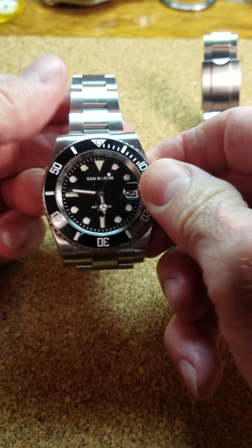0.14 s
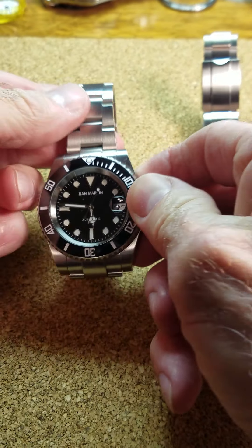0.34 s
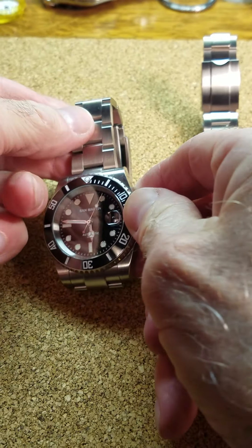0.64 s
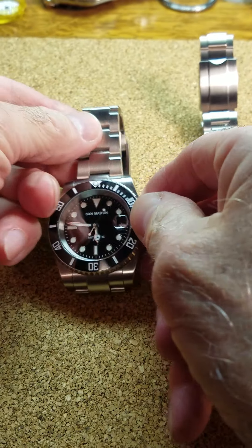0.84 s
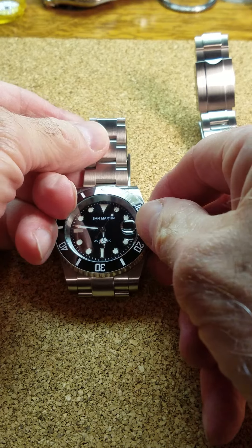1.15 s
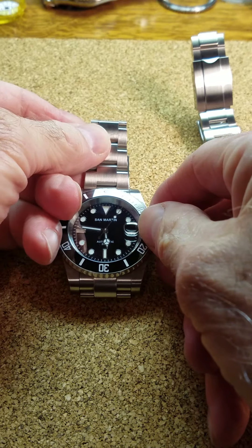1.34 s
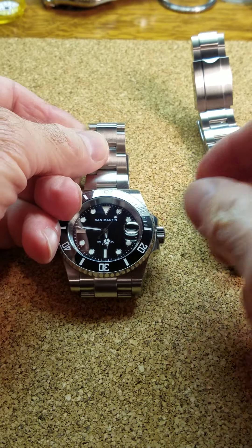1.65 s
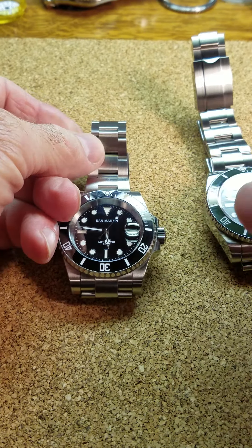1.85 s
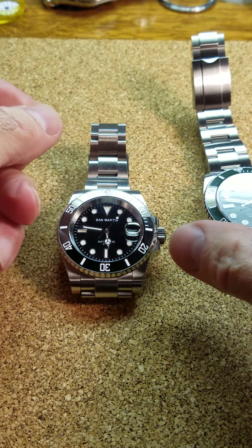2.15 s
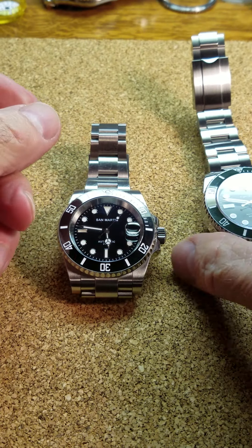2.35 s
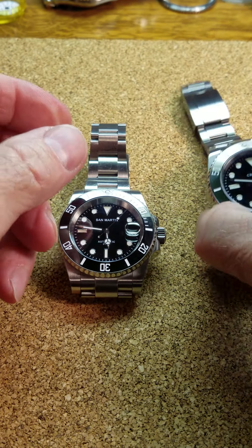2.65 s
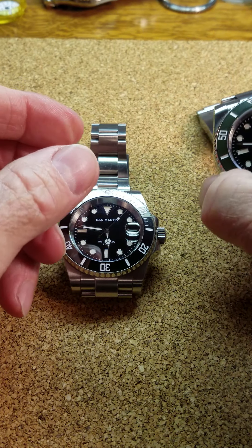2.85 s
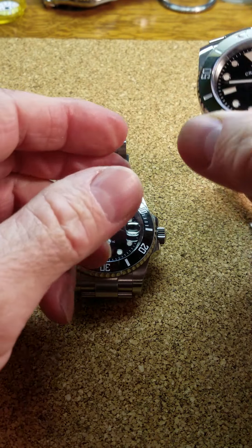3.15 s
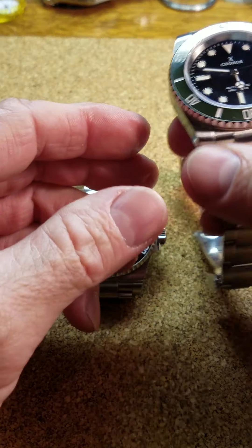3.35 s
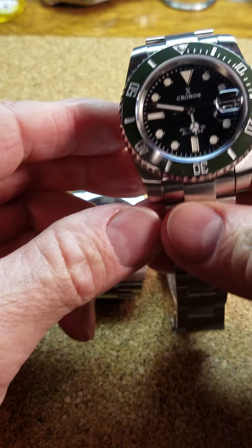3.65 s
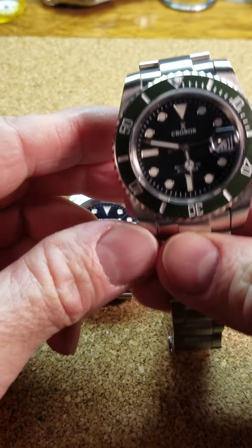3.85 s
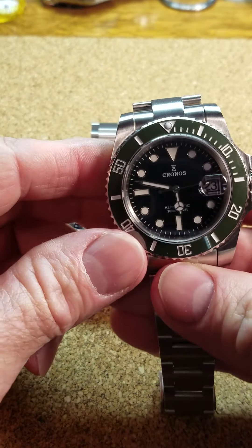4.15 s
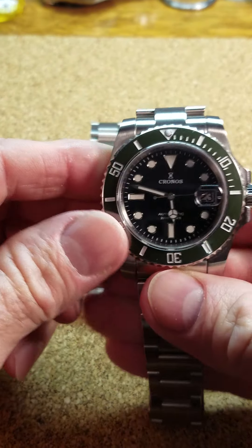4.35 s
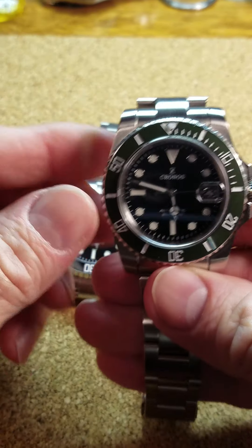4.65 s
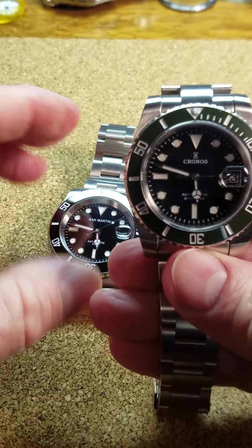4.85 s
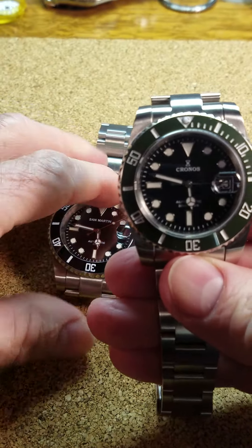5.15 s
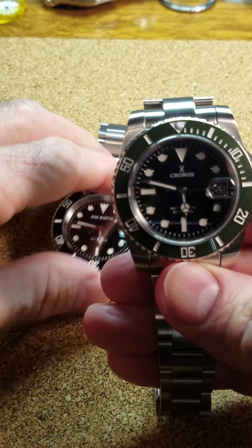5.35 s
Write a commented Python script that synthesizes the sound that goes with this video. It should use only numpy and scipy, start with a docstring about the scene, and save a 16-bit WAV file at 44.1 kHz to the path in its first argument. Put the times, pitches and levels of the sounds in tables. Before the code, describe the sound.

Close stereo pickup of hands handling two steel watches on a cork mat over a wooden table, in a small room with a short, faint reverberation. Quiet ticks open the scene, with a small crisp click at 0.2 s and mostly background until a tiny tap at 1.3 s. At 1.75 s a bright double clink comes with a soft table thud and faint dragging over cork. The loudest event is at 2.65 s: a sharp metallic clack and woody knock, then quick rattling links, duller bumps and rubbing. A high glassy clink follows at 3.07 s, with lighter clicks and thumps to 3.65 s. Small click clusters return around 4.0-4.25, 4.7 and 5.3-5.5 s, with whispery skin strokes. Low rumble and soft hiss continue throughout; a thin wavering low hum emerges near 3.3 s, dips, then grows clearer from 4.1 to 4.9 s before fading. Deep table sway rises at the end.

```python
"""At a wooden table with a cork mat, steel watch bracelets and cases are handled close to a two-port microphone.
Links click and rattle: each contact is a short burst of noise that shakes the resonances of the steel.
A clasp drops and other blows ring the table top, which also murmurs and sways under resting hands.
Skin rubbing steel and cases dragged over cork whisper as shaped noise; the room answers clicks and blows.
A wavering two-tone hum, a low noise rumble and microphone hiss lie underneath."""
import sys
import numpy as np
from scipy import signal
from scipy.fft import rfft, irfft, next_fast_len
from scipy.io import wavfile
from scipy.ndimage import uniform_filter1d, map_coordinates

SR = 44100
rng = np.random.default_rng(int(sys.argv[2]) if len(sys.argv) > 2 else 0)


def inscribe(sig):
    """Save sig as 16-bit PCM at rate SR to the path in sys.argv[1].

    A 1-D sig is mono; a 2-D sig holds one channel per row.
    Samples are clipped to [-1, 1] before scaling.
    """
    pcm = np.round(np.clip(np.atleast_2d(sig).T, -1, 1) * 32767)
    wavfile.write(sys.argv[1], SR, pcm.astype(np.int16))


def volts(x):
    """Linear amplitude factor 10**(x/20) for a level x in dB, scalar or array-like."""
    e = np.asarray(x, float) / 20
    return 10 ** e


N = 242991  # length in samples


def unit(x):
    """Scales a sound to rms 1."""
    return x / np.sqrt(np.mean(x ** 2) + 1e-20)


def along(points, hz):
    """Reads a curve of (Hz, value) points on a log frequency axis."""
    f, v = np.transpose(points)
    return np.interp(np.log(hz + 1), np.log(f + 1), v)


def curve(points):
    """Draws straight lines through (seconds, value) points, one value per sample."""
    s, v = np.transpose(points)
    return np.interp(np.arange(N) / SR, s, v)


def wobble(rate):
    """Draws a smooth random curve through the given number of random points per second."""
    knots = rng.standard_normal(int(N * rate / SR) + 4)
    return map_coordinates(knots, [np.arange(N) * rate / SR])


def filtered(x, response):
    """Multiplies the spectrum of a sound by a complex response of frequency."""
    n = x.shape[-1]
    m = next_fast_len(n + 8192)  # spare room so that ringing does not wrap around
    return irfft(rfft(x, m) * response(np.fft.rfftfreq(m, 1 / SR)), m)[..., :n]


def resonances(modes, scatter_db=0):
    """Sums damped resonances, each with a randomly scattered strength and every other one inverted."""
    levels_db = np.array([db for _, _, db in modes])
    gains = volts(levels_db + scatter_db * rng.standard_normal(len(modes)))

    def response(f):
        return sum((-1) ** k * gains[k] * 1j * f * width / (centre ** 2 - f ** 2 + 1j * f * width)
                   for k, (centre, width, _) in enumerate(modes))
    return response


def rush(spectrum, alike):
    """Makes stereo noise of rms 1 with the given spectrum and left-right likeness."""
    def mid_side(hz):
        angle = np.arccos(np.clip(along(alike, hz), -1, 1)) / 2
        return volts(along(spectrum, hz)) * [np.cos(angle), np.sin(angle)]
    mid, side = filtered(rng.standard_normal((2, N)), mid_side)
    return unit(np.array([mid + side, mid - side]))


def evened(x):
    """Flattens the coarse bumps in the spectrum of a noise burst."""
    z = rfft(x)
    coarse_power = uniform_filter1d(np.abs(z) ** 2, size=40, axis=-1)
    return irfft(z / np.sqrt(coarse_power), x.shape[-1])


def swell(start, length, db):
    """Rises and falls once, peaking at the given level."""
    progress = np.clip((np.arange(N) / SR - start) / length, 0, 1)
    return volts(db) * np.sin(np.pi * progress) ** .5


# Contacts between links. Each row: start in seconds, relative strength in dB,
# then glint, clink and knock in dB compared with the spark band.
LINK_CONTACTS = [(0.137, -68, -12, -5, 10.5), (0.17, -83, -10, -6, 13), (0.203, -62, -14, 0, 4.5),
                 (0.2238, -44.5, -6, -6, -33), (0.4926, -65.5, -12, 11, -15), (0.7088, -55, -2, -29, -23),
                 (1.288, -68.5, -7, 10.5, 15.5), (1.2967, -73, -17, 14, -5), (1.7488, -39, -1, 1, -11),
                 (1.7638, -46, -6, 1, -9), (1.7674, -47, 3, 4, -1.5), (2.572, -53.5, -4, -8, -10.5),
                 (2.6543, -33.5, 4.5, -5.5, 2), (2.682, -41, -6, -4.5, -11), (2.6976, -48, 0, -0.5, -4),
                 (2.711, -43.5, -11, -9.5, -14), (2.8544, -67, -6, 3.5, 8.5), (2.9084, -66.5, 3, -16, 10.5),
                 (2.9233, -64, 6, -4, 8), (3.015, -64, 15.5, -13, -6), (3.019, -63.5, 9, -1, 5),
                 (3.0383, -61, 12, -4, -6), (3.0498, -52.5, -3, -7, 0), (3.0739, -37.5, 13, 3, -4.5),
                 (3.1595, -66, 4, 2, 6), (3.2878, -57, -1, -1, -4), (3.36, -46, -8, -3, -9),
                 (3.393, -61.5, 5, 0, -16), (3.4131, -55.5, 9, 2.5, 2.5), (3.617, -63, -4, 0.5, 1),
                 (3.6437, -63, 3, -2, 2), (4.0113, -57.5, -7, 1, -4), (4.0162, -50, -14, 2, -5),
                 (4.0664, -47, -11, -4.5, -11), (4.1099, -54.5, -3, 8, 2), (4.148, -45, -2, -5, -11),
                 (4.1584, -41.5, -5, -5, -11), (4.2482, -59.5, -13, 1, -10), (4.353, -63, -12, 0, -17),
                 (4.376, -69, -8, 7, 7), (4.596, -64.5, -8, 3.5, 4), (4.6817, -55, -16, 0.5, -9),
                 (4.7041, -46.5, -12, -2.5, -14), (4.7223, -53.5, -12, 0, -5.5),
                 (4.7416, -40.5, -1, -8, -19), (5.1346, -57.5, -17, -4, 0.5), (5.3141, -59.5, -6, 2, -6),
                 (5.399, -65, -8, 2, -2), (5.4359, -49.5, -9.5, -0.5, -5), (5.4607, -47.5, -19, 1, -4.5),
                 (5.4881, -57, -14, 7, 3.5)]
# Place of the handled watch. Each row: time in seconds, left-right difference in dB.
WATCH_PLACE = [(0, 0), (0.71, 4.5), (1.75, 3.5), (2.7, 8), (3.0, 1.5), (3.3, 1), (4.0, 1.5), (4.6, -2),
               (4.7, -5.5), (4.75, -1), (5.45, -3.5)]


def contacts():
    """Links meet, stray ticks fall at random, and each contact rebounds once, duller and panned the other way."""
    tick_count, tick_db, tick_spread_db = 10, -75.5, 6
    glint_db, clink_db, knock_db = -5, 3, -9  # colour of the ticks
    rebound_s, rebound_db, rebound_glint_db = .0068, -12.5, -22  # delay, loss, extra loss of glint
    stray = [(u * N / SR, tick_db + tick_spread_db * v, glint_db, clink_db, knock_db)
             for u, v in rng.random((tick_count, 2))]
    first = np.array(LINK_CONTACTS + stray)
    pan_db = np.interp(first[:, 0], *np.transpose(WATCH_PLACE))
    again = first + [rebound_s, rebound_db, rebound_glint_db, 0, 0]
    return np.r_[np.c_[first, pan_db], np.c_[again, -pan_db]]


# Resonances of the steel links, four bands from the low knock up to the highest glint.
# Each row: centre in Hz, width in Hz, level in dB relative to the others in its band (before random scatter).
KNOCK_MODES = [(944, 920, -5), (1740, 580, -4.5), (2510, 530, -10.5)]
CLINK_MODES = [(3730, 1100, -10.5), (4680, 250, 4), (5960, 2550, 0.5), (8120, 1100, 6.5)]
SPARK_MODES = [(9740, 1650, -2.5), (10680, 1130, 8), (13170, 9600, 4.2)]
GLINT_MODES = [(14160, 2000, -10.5), (15340, 2100, 0.5), (15200, 1800, 0)]


def links():
    """Each contact is a brief chatter that shakes the steel; the two ports hear it by different paths."""
    out, t = np.zeros((2, N + SR)), np.arange(2048) / SR
    for start, db, glint_db, clink_db, knock_db, pan_db in contacts():
        shared, *own = rng.standard_normal((3, len(t)))
        fade_s = 0.024 * volts(-.12 * (db + 43))  # time to fall 60 dB: harder contacts are crisper
        fade = volts(-60 * t / fade_s)
        chatter = fade * evened(fade * (0.18 * shared + np.array(own)))
        hit = 0
        for modes, level_db in ((SPARK_MODES, 0), (GLINT_MODES, glint_db),
                                (CLINK_MODES, clink_db), (KNOCK_MODES, knock_db)):
            band = filtered(chatter, resonances(modes, scatter_db=4))
            hit = hit + volts(level_db) * band / np.linalg.norm(band, axis=1, keepdims=True)
        port_db = np.array([[pan_db / 2], [-pan_db / 2]])
        out[:, round(start * SR):][:, :len(t)] += volts(db + 17.5 + port_db) * hit
    return out[:, :N]


# Blows that reach the table top. Each row: start in seconds, strength in dB,
# contact time in seconds (about half the length of the push).
TABLE_BLOWS = [(1.288, -60, .0002), (1.358, -61, 0.00016), (1.749, -49, 0.00095), (1.7655, -49.5, 0.001),
               (1.772, -49.5, 0.0022), (2.6538, -28.5, 0.00014), (2.6603, -36.5, 0.00064),
               (2.6721, -36, 0.00056), (2.683, -38, 0.00048), (2.85, -44, 0.0029), (2.921, -46.5, 0.0021),
               (2.98, -44.5, 0.0038), (3.035, -52, 0.0015), (3.075, -51, 0.00012), (3.155, -54.5, 0.0011),
               (3.301, -47, 0.0022), (3.351, -52.5, 0.00089), (3.41, -44.5, 0.0011), (3.429, -56, 0.0013),
               (4.009, -54, 0.0028), (4.105, -50, 0.0022)]
# Ringing modes of the table top. Each row: pitch in Hz, relative level in dB,
# seconds to fall 60 dB before any extra damping, left-right difference in dB.
TABLE_MODES = [(74, -34, 0.2, 2), (144.65, -0.5, 0.43, 0), (235, -12.5, 0.54, 2), (255.3, 1, 0.24, -2.5),
               (301.4, 2, 0.086, -3.5), (339, -17, 0.071, -11), (449, -17, 0.076, 11.5),
               (589, -10, 0.037, 7.5), (685, -22.5, 0.12, 3), (745, -11, 0.028, 0), (847, -2, 0.012, 0),
               (1060, -8, 0.015, -7.5), (1200, -14, 0.013, -5), (1360, -16, 0.011, 0)]
# Hands pressing on the table. Each row: time in seconds, murmur level in dB.
HAND_MURMUR = [(0.0, -71.5), (0.4, -60), (0.65, -62.5), (0.8, -66.5), (2.0, -65), (2.12, -70),
               (2.35, -65.5), (2.65, -61.5), (2.79, -48.5), (2.89, -59.5), (3.1, -55), (3.27, -64),
               (3.39, -57), (3.5, -62), (3.88, -64.5), (4.08, -62), (4.4, -61.5), (5.17, -63.5),
               (5.51, -62.5)]
# Deep sway of the table. Each row: time in seconds, level in dB before it wavers.
SWAY_LEVEL = [(0, -66), (1.3, -65), (2.0, -69), (2.65, -68), (2.79, -55), (2.95, -62), (4.1, -70.5),
              (5.51, -51)]
# Colour of the sway. Each row: frequency in Hz, relative level in dB per Hz.
SWAY_SPECTRUM = [(25, -120), (40, -2.5), (60, 2), (85, -6), (120, -120)]


def table():
    """Blows ring the modes of the table top; hands resting and sliding on it keep its low modes murmuring."""
    free_drop_db = -40  # stronger blows are drops with the hand lifted
    free_db_per_s, held_db_per_s, murmur_db_per_s = 30, 273, 150  # extra damping
    t = np.arange(SR // 2) / SR
    modes = np.array([-volts(db - 60 * t / t60) * np.sin(2 * np.pi * hz * t)
                      for hz, db, t60, _ in TABLE_MODES])
    # Each mode moves the two ports unequally.
    lean_db = np.outer([.5, -.5], [lean for *_, lean in TABLE_MODES])
    ring = volts(lean_db) @ modes

    struck = np.zeros((2, N + SR))
    for start, db, contact in TABLE_BLOWS:
        # A softer contact pushes longer and rings fewer high modes.
        push = np.hanning(round(2 * contact * SR) + 3)
        # A resting hand soaks up the ring.
        damping = free_db_per_s if db > free_drop_db else held_db_per_s
        blow = signal.lfilter(push / push.sum(), 1, ring * volts(-damping * t))
        struck[:, round(start * SR):][:, :len(t)] += volts(db) * blow

    # Soft palms shake only the low modes.
    shake = uniform_filter1d(rng.standard_normal(N), size=30) * volts(2.03 * wobble(12))
    murmur = signal.fftconvolve(shake[None], ring * volts(-murmur_db_per_s * t), axes=1)[:, :N]
    sway_db = curve(SWAY_LEVEL) + 3 * wobble(5)
    sway = volts(sway_db) * rush(SWAY_SPECTRUM, [(60, 1.0)])
    return struck[:, :N] + volts(curve(HAND_MURMUR)) * unit(murmur) + sway


# Strokes of skin over steel. Each row: start in seconds, length in seconds, level in dB before the grain,
# top-end sheen in dB compared with the stroke.
SKIN_STROKES = [(0.197, 0.15, -76.5, -4), (2.391, 0.097, -70.5, -7), (2.69, 0.17, -72.5, -2),
                (2.84, 0.17, -74.5, -5), (3.037, 0.053, -71.5, -19), (3.336, 0.065, -71.5, -5),
                (3.931, 0.12, -72, -2), (4.324, 0.098, -74, -17), (4.466, 0.1, -75, -4),
                (4.68, 0.046, -78, -11), (4.764, 0.092, -75, 5.5), (5.156, 0.09, -76, 1),
                (5.349, 0.1, -71.5, -12)]
# Cases pulled over cork. Each row: start in seconds, length in seconds, level in dB before the grain.
CORK_DRAGS = [(0.042, .25, -83), (1.7, 0.39, -87), (2.603, 0.28, -73), (2.846, 0.32, -69)]
# Colours of the rub, its sheen and the drag. Each row: frequency in Hz, relative level in dB per Hz.
RUB_SPECTRUM = [(900, -120), (1400, 4), (3000, 2), (6000, -5), (10500, -6.5), (11000, -120)]
SHEEN_SPECTRUM = [(10300, -120), (10800, -3), (14000, -6), (15900, 2), (16000, -120)]
DRAG_SPECTRUM = [(300, -120), (500, 7), (1200, -8.5), (2500, -17), (4000, -120)]


def skin():
    """Fingers slide over steel in short swelling strokes, cases drag over cork: a grainy whisper."""
    swells = np.array([swell(start, length, db) for start, length, db, _ in SKIN_STROKES])
    sheen_swell = volts([sheen_db for *_, sheen_db in SKIN_STROKES]) @ swells
    rub = swells.sum(axis=0) * rush(RUB_SPECTRUM, [(1000, 0.16)])
    sheen = sheen_swell * rush(SHEEN_SPECTRUM, [(1000, 0.092)])
    drag_swell = volts(-78.5) + sum(swell(*row) for row in CORK_DRAGS)  # a faint steady shifting, plus the pulls
    drag = drag_swell * volts(wobble(40)) * rush(DRAG_SPECTRUM, [(1000, 0.21)])
    return volts(2.7 * wobble(120)) * (rub + sheen) + drag


# How fast the room dies away. Each row: frequency in Hz, seconds to fall 60 dB.
ROOM_DECAY = [(300, 0.27), (2000, 0.23), (8000, 0.13), (15000, 0.12)]


def room(x):
    """Answers with a short diffuse tail of fading noise, new every third of a second."""
    out, step = np.zeros((2, N + SR)), SR // 3
    for start in range(0, N, step):
        hz, t, z = signal.stft(rng.standard_normal((2, step)), SR, nperseg=256)
        fade = volts(-60 * t / along(ROOM_DECAY, hz)[:, None])
        tail = signal.istft(z * fade, SR, nperseg=256)[1]
        wet = signal.fftconvolve(x[:, start:start + step], tail / np.linalg.norm(tail[0]), axes=1)
        out[:, start + 120:][:, :wet.shape[1]] += wet  # the answer comes 120 samples late
    return out[:, :N]


# Loudness of the hum. Each row: time in seconds, level of the upper tone in dB before it wavers.
HUM_LEVEL = [(0, -81), (3.25, -78), (3.33, -62), (3.6, -68.5), (3.95, -72), (4.1, -63), (4.9, -61.5),
             (5.51, -72)]


def hum():
    """Sounds a thin wavering tone at 237 Hz and a weaker one at half that pitch."""
    turn = 2 * np.pi * 237 * np.arange(N) / SR
    tones = np.sin(turn) + volts(-3.5) * np.sin(turn / 2)
    return np.sqrt(2) * volts(curve(HUM_LEVEL) + .8 * wobble(4.85)) * tones


# Colours of the room rumble and the microphone hiss. Each row: frequency in Hz, relative level in dB per Hz.
RUMBLE_SPECTRUM = [(12, -50), (20, 13.5), (27, -9.5), (39, -6), (65, -5.5), (97, -12), (153, 0),
                   (188, -8.5), (220, -6), (282, -26), (329, -10), (380, -19), (450, -22), (580, -32),
                   (990, -120)]
HISS_SPECTRUM = [(300, -37), (420, -4), (600, -12), (1100, -9), (2000, -11.5), (3500, -16), (6000, -22.5),
                 (9000, -26), (11000, -22.5), (13500, -17), (15900, -17.5), (16000, -120)]
# How alike the two channels are. Each row: frequency in Hz, likeness (1 is identical, 0 unrelated).
FLOOR_LIKENESS = [(60, 0.7), (180, 0.99), (550, 0.026), (1650, -0.06), (4970, -0.16), (15000, 0.07)]


def floor():
    """Low room rumble and microphone hiss, two steady noises that never pause."""
    rumble = volts(-60.5) * rush(RUMBLE_SPECTRUM, FLOOR_LIKENESS)
    hiss = volts(-71) * rush(HISS_SPECTRUM, FLOOR_LIKENESS)
    return rumble + hiss


def scene():
    """Sets the close sounds, and the room's answer to steel and wood, over hum and floor."""
    steel, wood = links(), table()
    answer = volts(-11.5) * room(steel) + volts(-12.5) * room(wood)
    return steel + wood + answer + skin() + hum() + floor()


def band_limit(x):
    """A steep low-pass at the top of the band."""
    return signal.sosfilt(signal.butter(12, 17150, fs=SR, output="sos"), x)


def record(dry):
    """The microphone loses the deepest bass, below about 50 Hz."""
    def bass_cut(hz):
        return (1j * hz / (50 + 1j * hz)) ** 3
    return band_limit(filtered(dry, bass_cut))


dry = scene()
out = record(dry)
inscribe(out)
```